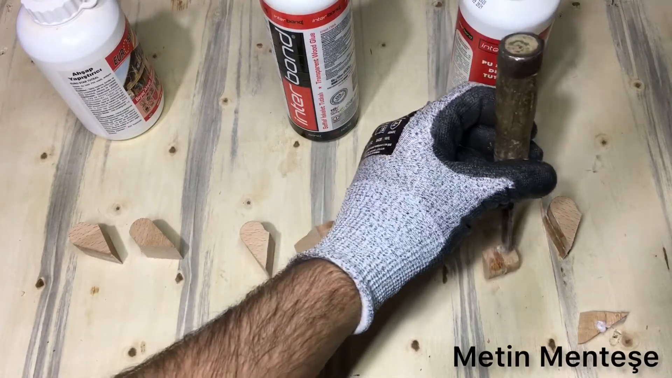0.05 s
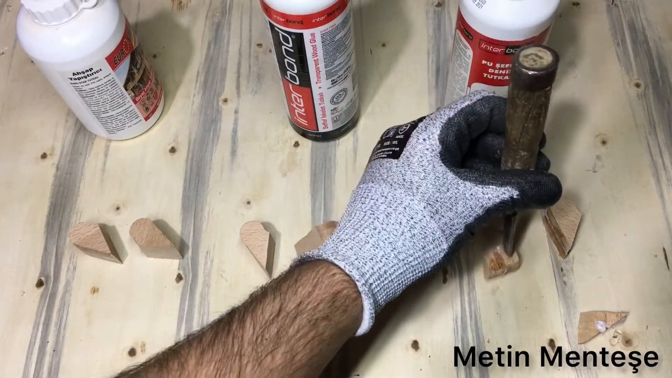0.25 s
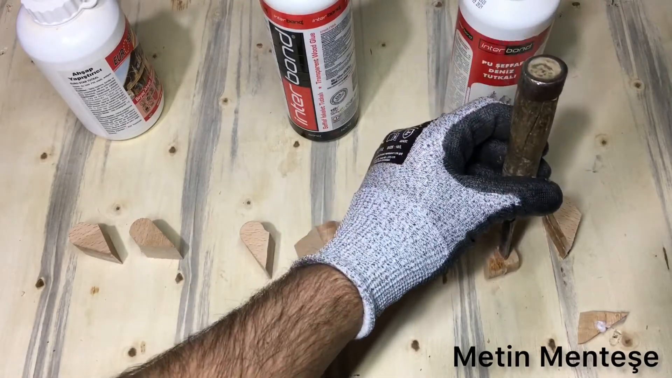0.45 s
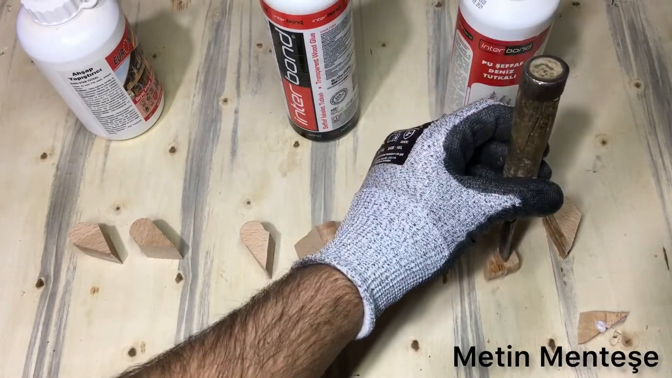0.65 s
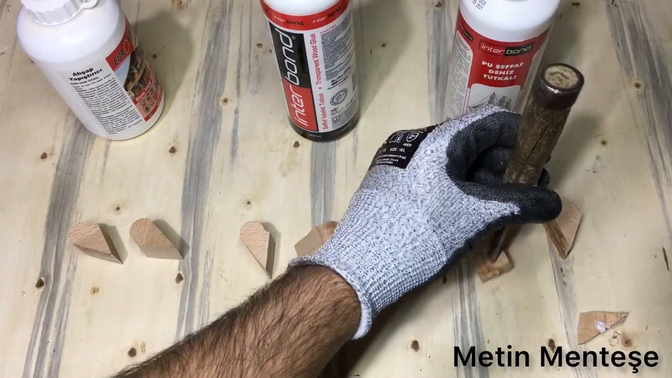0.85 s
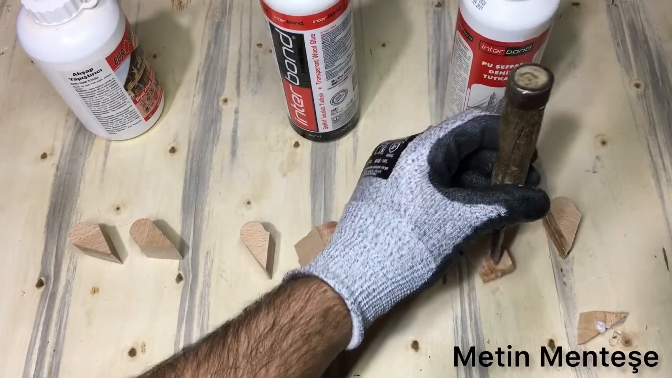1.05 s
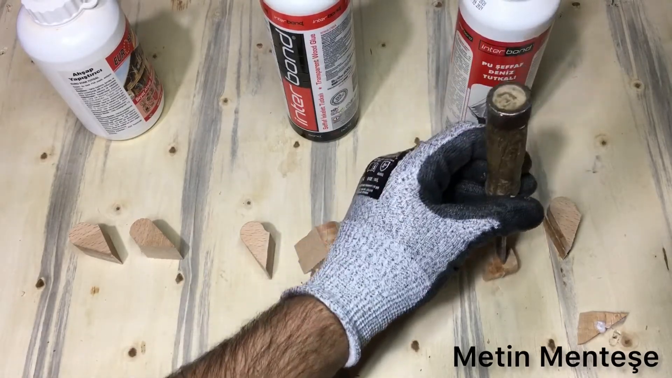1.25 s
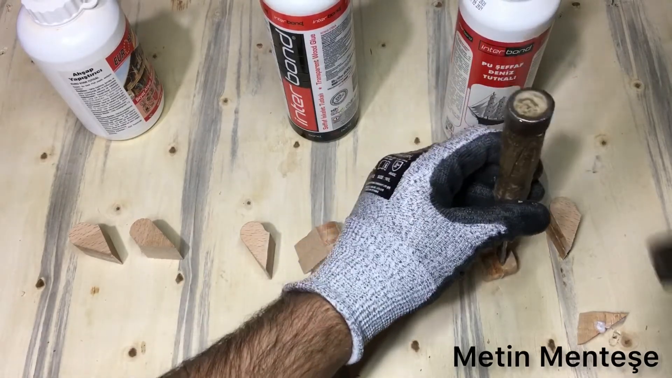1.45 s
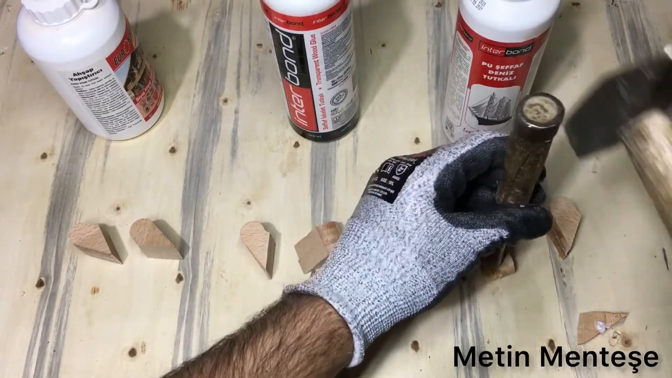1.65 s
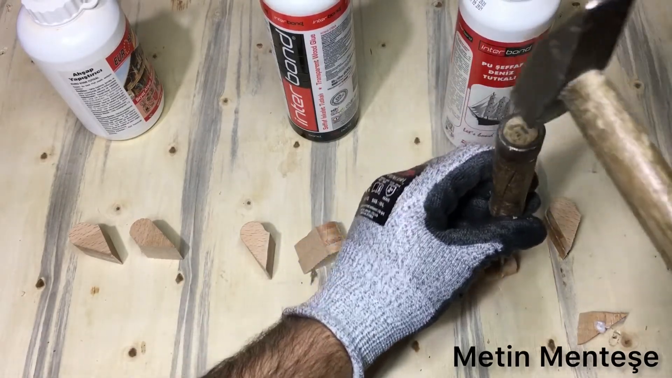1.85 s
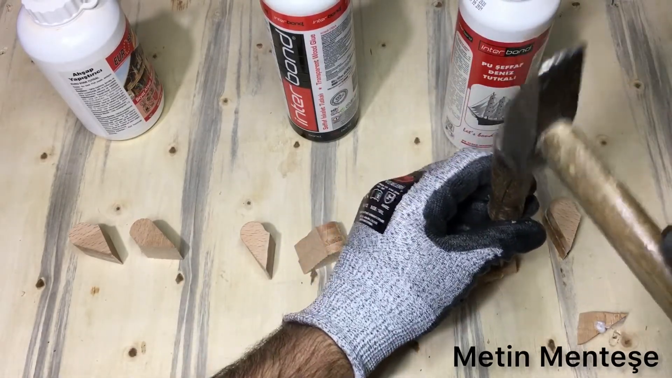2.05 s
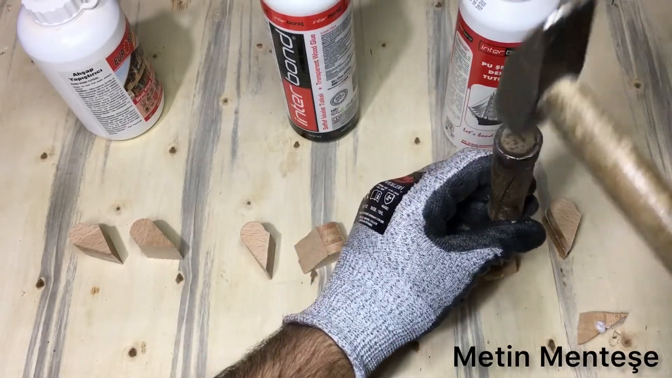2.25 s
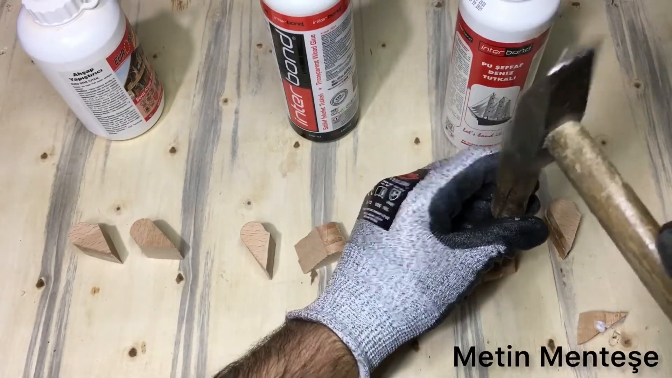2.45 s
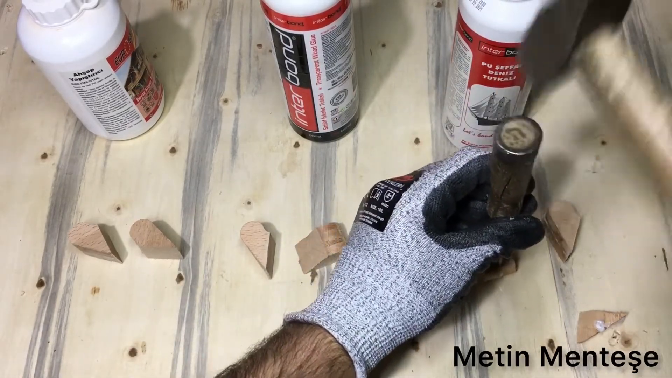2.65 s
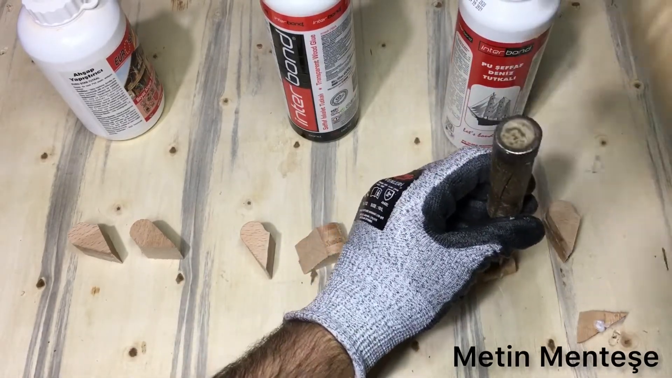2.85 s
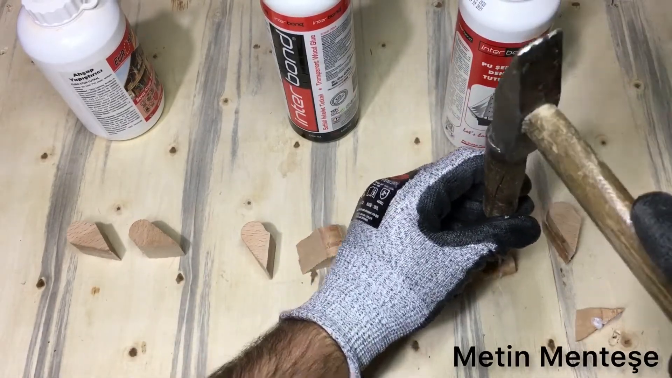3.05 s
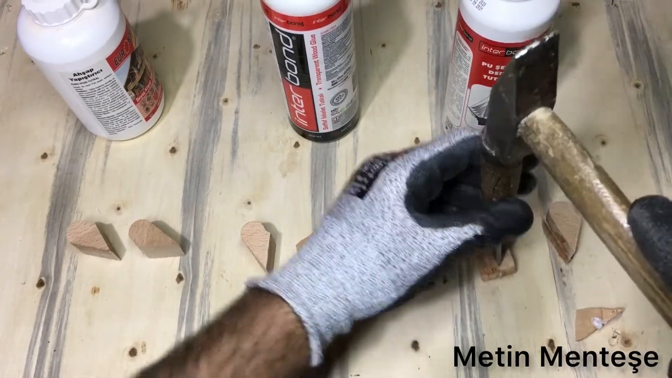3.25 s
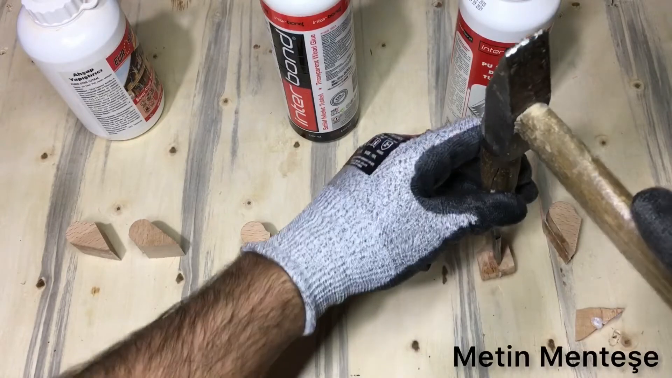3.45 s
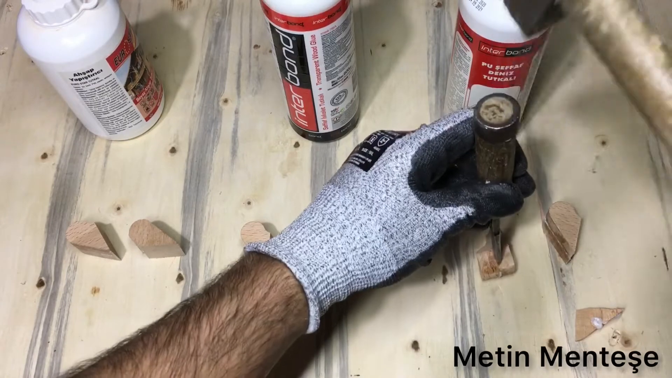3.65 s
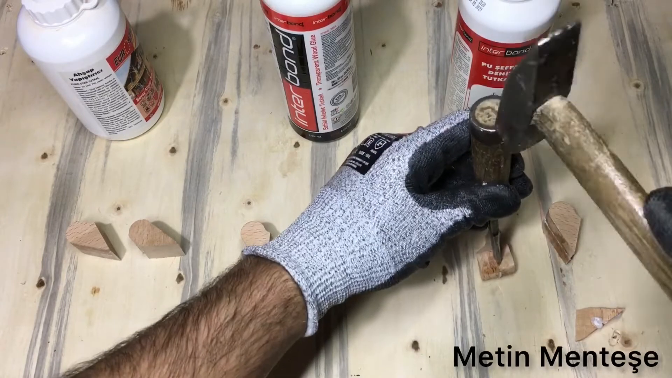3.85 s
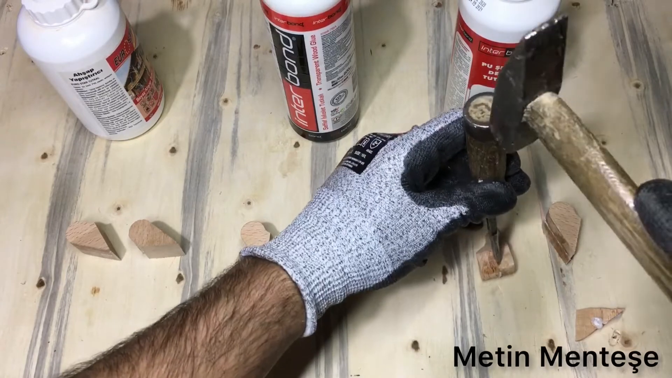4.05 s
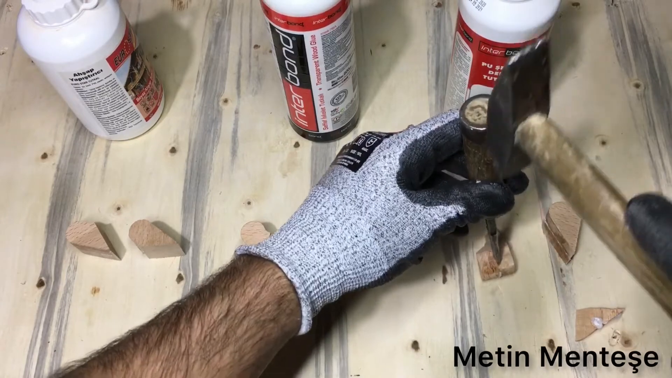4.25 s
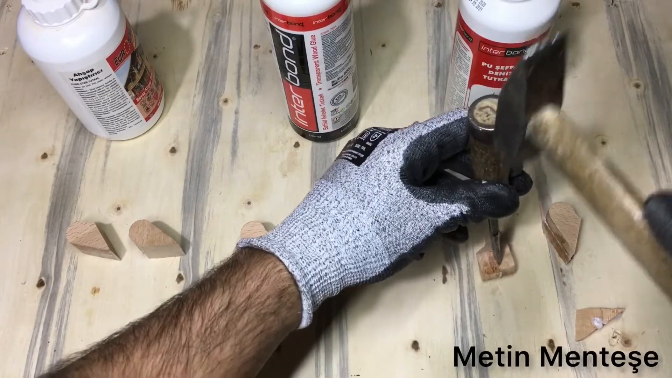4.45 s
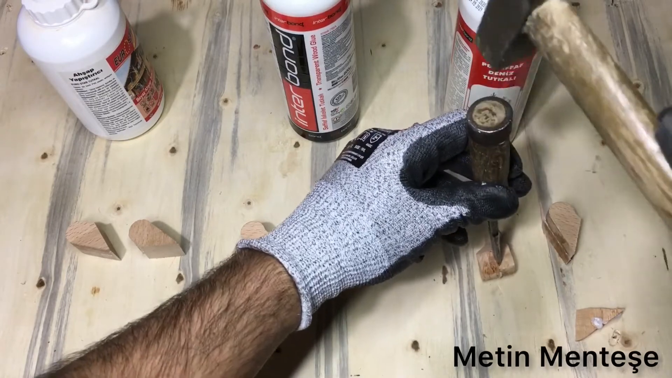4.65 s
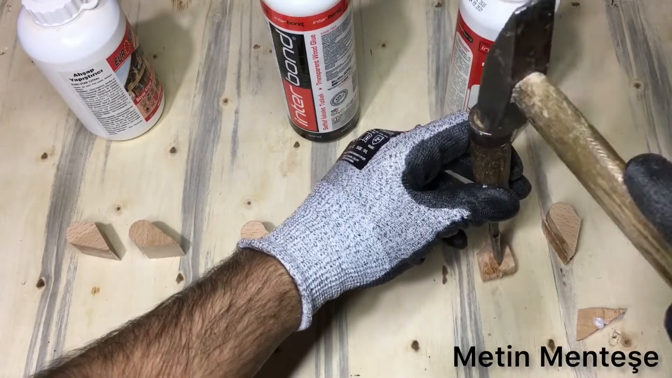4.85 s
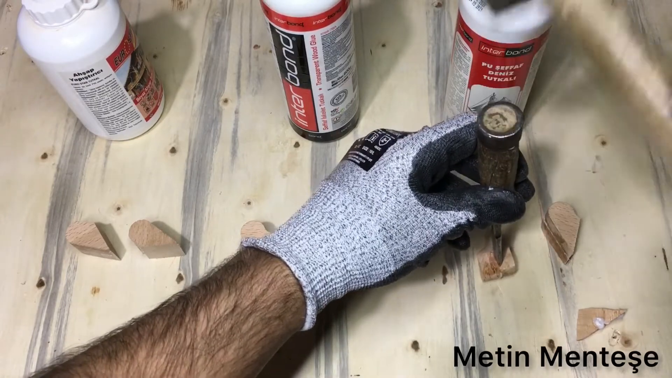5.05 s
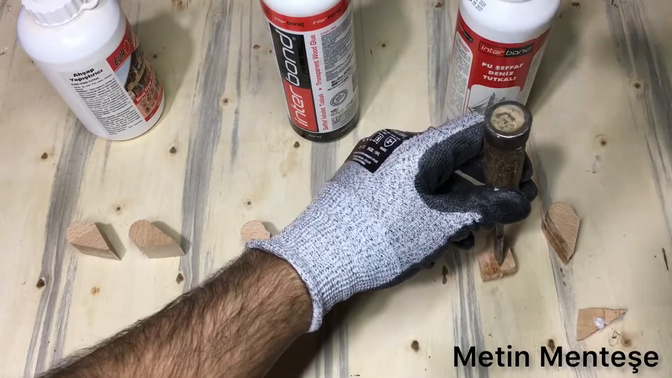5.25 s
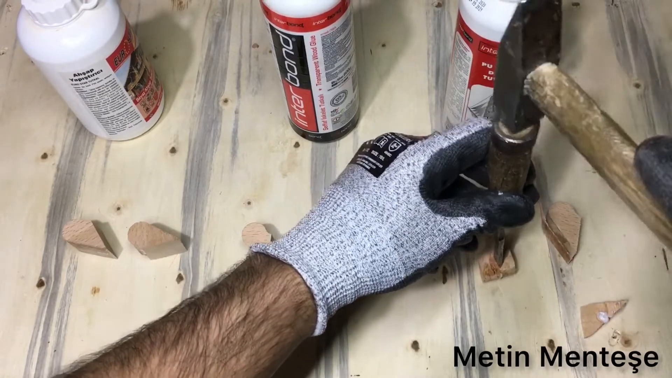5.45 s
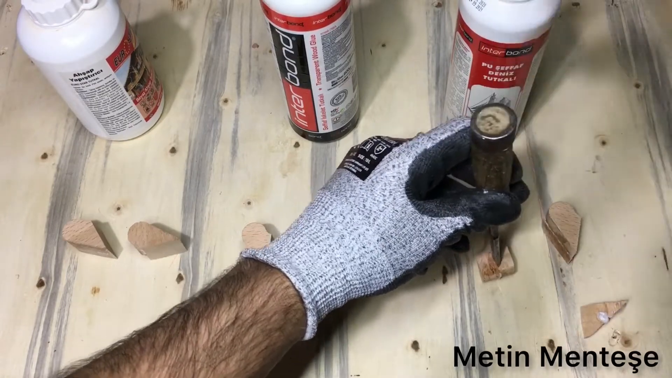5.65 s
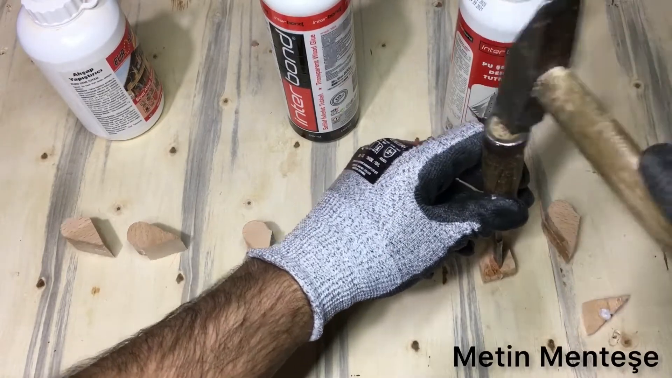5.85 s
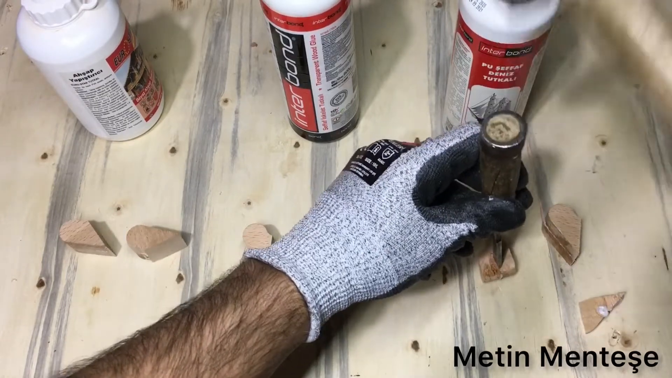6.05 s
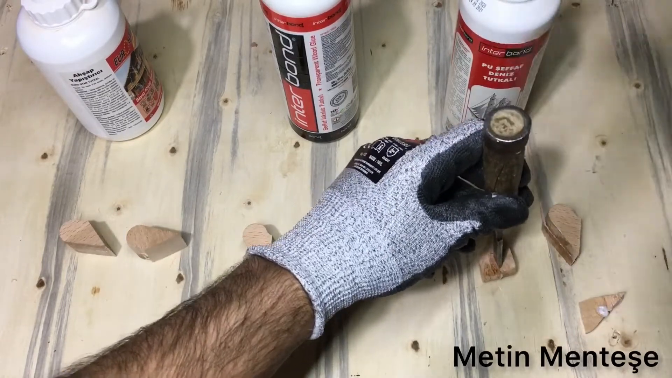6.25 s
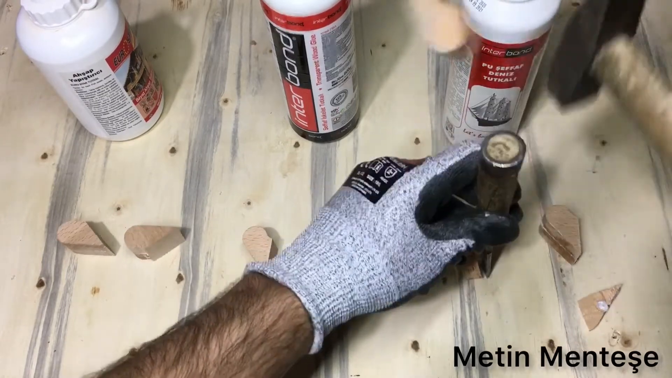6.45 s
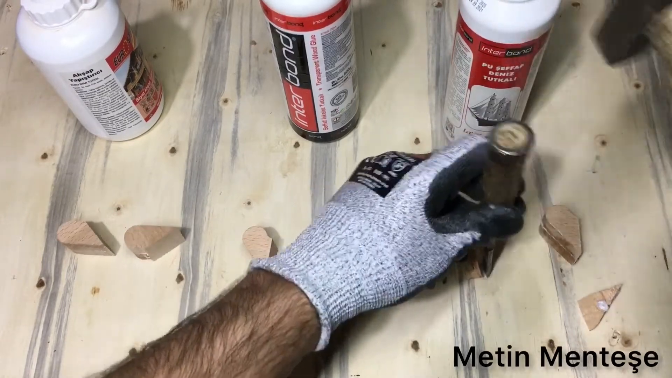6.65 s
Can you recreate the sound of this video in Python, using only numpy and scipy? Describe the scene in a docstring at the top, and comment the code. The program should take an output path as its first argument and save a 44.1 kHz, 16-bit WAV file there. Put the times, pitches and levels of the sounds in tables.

```python
"""Hammer and chisel on a workshop bench

A steel hammer strikes a capped chisel eight times to split glued blocks off a plywood bench in a small
workshop. Each blow clicks and pings in the steel (shaped noise, decaying sines), cracks the wood, thuds the
bench modes and rattles loose things. Around the blows soft broadband rustles come and go (noise under swelling
and fading envelopes), the chisel knocks faintly and the hammer face squeaks once on the cap, all over still
air."""
import sys
import numpy as np
from scipy import signal
from scipy.fft import rfft, irfft
from scipy.io import wavfile

SR = 44100
rng = np.random.default_rng(int(sys.argv[2]) if len(sys.argv) > 2 else 0)


def digitize_waveform(pressure):
    """Quantize a signal to 16-bit integers and store it at the path in sys.argv[1].

    Rows of a 2-D input are taken as channels; values are limited to [-1, 1].
    """
    field = np.atleast_2d(pressure).T
    bounded = np.clip(field, -1, 1)
    quanta = np.round(bounded * 32767).astype(np.int16)
    wavfile.write(sys.argv[1], SR, quanta)


N = 295911
RING_S = 1.2
AGE = np.arange(int(RING_S * SR)) / SR   # seconds since a contact


def from_db(db):
    """Decibels to gain."""
    return 10 ** (np.asarray(db) / 20)


def rms_one(x):
    """Scale to unit rms."""
    return x / np.sqrt(np.mean(x ** 2) + 1e-20)


def at_hz(points, hz):
    """Read a table on a log-frequency axis."""
    freqs, values = np.transpose(points)
    return np.interp(np.log(hz + 1e-3), np.log(freqs), values)


def fade(t60_s):
    """Exponential decay after a contact: 60 dB in t60_s."""
    return np.exp(-np.log(1000) * AGE / max(t60_s, 1e-3))


def swell(rise_s):
    """Vibration builds up exponentially towards one."""
    return 1 - np.exp(-AGE / max(rise_s, 1e-5))


def add(out, s, sound):
    """Mix a sound in at time s, cut at the end of out."""
    start = int(np.clip(round(s * SR), 0, len(out)))
    out[start:start + len(sound)] += sound[:len(out) - start]


def filtered(x, gain):
    """Weight the spectrum of x by a gain per frequency bin."""
    return irfft(rfft(x) * gain, len(x))


def noise(spectrum, size):
    """Unit-rms noise with a given spectrum."""
    hz = np.fft.rfftfreq(size, 1 / SR)
    return rms_one(filtered(rng.standard_normal(size), from_db(at_hz(spectrum, hz))))


def tilted(x, tilt_db_per_octave):
    """Brighten or dull a sound about 1 kHz, flat below 250 Hz, at unit rms."""
    hz = np.fft.rfftfreq(len(x), 1 / SR)
    octaves = np.log2(np.clip(hz, 250, None) / 1000)
    return rms_one(filtered(x, from_db(tilt_db_per_octave * octaves)))


def dying(x, t60s, rise_1khz_s):
    """Each octave dies at its own rate; low ones build up later, as slow bending waves do."""
    centres_hz = 60 * 2. ** np.arange(9)
    hz, bins = np.fft.rfftfreq(len(x), 1 / SR), rfft(x)
    out = np.zeros(len(x))
    for centre_hz, one in zip(centres_hz, np.eye(len(centres_hz))):
        band = irfft(bins * np.interp(hz, centres_hz, one), len(x))
        rise_s = rise_1khz_s * np.sqrt(1000 / centre_hz)
        out += band * fade(at_hz(t60s, centre_hz)) * swell(rise_s) ** 2
    return out


def ring(modes):
    """Struck modes as decaying sines; every blow shares its strength among them a little differently."""
    scatter_db = rng.normal(0, 1.2, len(modes))
    out = np.zeros(len(AGE))
    for (hz, db, t60_s), offset_db in zip(modes, scatter_db):
        out += from_db(db + offset_db) * np.sin(2 * np.pi * hz * AGE) * fade(t60_s)
    return out


def reflected(sound, wet_db=-3, t60_s=0.14):
    """Reflections off bench and walls make a clean ring flutter as it dies."""
    echoes = rng.standard_normal(len(AGE)) * fade(t60_s) * swell(.004)
    echoes *= from_db(wet_db) / np.sqrt(np.sum(echoes ** 2))
    return sound + signal.fftconvolve(sound, echoes)[:len(sound)]


# Spectrum of the still air. Each row: frequency in Hz, level in dB per Hz.
AIR_SPECTRUM = [(18, -36.5), (30, -1), (64, 10.5), (145, 0.5), (259, 0.5), (866, -9.5), (1590, -3),
                (4910, -19.5), (12300, -36), (16000, -31)]
AIR_DB = -63


def still_air():
    """Air of the workshop: steady shaped noise."""
    return from_db(AIR_DB) * noise(AIR_SPECTRUM, N)


# Rumble of the arm resting on the bench. Each row: time in seconds, level in dB.
ARM_LEVEL = [(0.0, -74), (.55, -63), (.85, -55), (1.3, -59.5), (1.7, -58), (2.0, -56.5), (2.8, -54.5),
             (4.1, -61), (4.4, -63.5), (4.55, -56.5), (5.2, -65), (6.7, -62.5)]
# Spectrum of that rumble. Each row: frequency in Hz, level in dB per Hz.
ARM_SPECTRUM = [(30, -42), (60, 1), (120, -6.5), (270, 2.5), (450, -7), (1100, -12), (3000, -31.5)]


def arm_rumble():
    """The arm shifts on the bench: low noise following a level curve."""
    level_db = np.interp(np.arange(N) / SR, *np.transpose(ARM_LEVEL))
    return from_db(level_db) * noise(ARM_SPECTRUM, N)


def rub(length_s, attack_s=0.037, release_t60_s=.33):
    """Envelope of one rustle: attack, hold, release."""
    attack = np.clip(AGE / attack_s, 0, 1)
    return attack * np.interp(AGE - length_s, AGE, fade(release_t60_s))


# Soft rustles, some leading into the blows. Each row: start in seconds, length in seconds, level in dB.
RUSTLES = [(0.0, .16, -56.5), (0.352, .06, -50), (0.493, .14, -56), (0.735, .43, -54),
           (1.279, 0.44, -54), (1.36, .1, -56.5), (1.779, .03, -54), (1.857, .05, -59),
           (2.274, .15, -51), (2.735, 0.22, -54), (3.146, 0.84, -59), (3.33, 0.29, -54),
           (3.402, .06, -50), (4.017, .12, -56), (4.313, 0.092, -59.5), (5.007, .12, -56),
           (6.222, 0.096, -49), (6.633, .1, -51.5)]
# Spectrum of the rustles. Each row: frequency in Hz, level in dB per Hz.
RUSTLE_SPECTRUM = [(240, -21.5), (400, -3.5), (742, -6), (1110, -1.5), (1400, -4.5), (2180, -6), (5030, -13),
                   (9320, -17.5), (13900, -23.5), (16000, -34)]
RUSTLE_FLOOR_DB = -65   # steady floor under the rustles


def random_curve(rate_hz):
    """Unit-variance random points at rate_hz, joined by straight lines."""
    return np.interp(np.arange(N) / SR * rate_hz, np.arange(N), rng.standard_normal(N))


def rustles(catch_db=1.5, catch_hz=90, waver_db=3.36, waver_hz=14):
    """Soft broadband rustles that flutter quickly and waver slowly."""
    power = np.full(N, from_db(RUSTLE_FLOOR_DB) ** 2)
    for s, length_s, db in RUSTLES:
        add(power, s, (from_db(db) * rub(length_s)) ** 2)
    flutter_db = catch_db * random_curve(catch_hz) + waver_db * random_curve(waver_hz)
    return np.sqrt(power) * from_db(flutter_db) * noise(RUSTLE_SPECTRUM, N)


# Faint contacts. Each row: start in seconds, level in dB, tilt in dB per octave, t60 in seconds.
KNOCK_EVENTS = [(0.161, -50, 1.5, 0.21), (0.375, -51, 1, 0.26), (0.627, -42, 0.5, 0.048),
                (0.755, -40.5, -1.5, 0.39), (0.786, -48, 7, 0.2), (1.186, -44, -18, 0.11),
                (1.658, -44.5, -23, 0.4), (1.886, -51, 0.5, 0.47), (2.393, -40, 0.5, 0.58),
                (3.566, -37.5, 8, 0.17), (3.791, -45.5, 2.5, 0.22), (4.068, -44.5, -14, 0.28),
                (4.132, -44, -0.5, 0.1), (4.288, -43, 2, 0.19), (6.693, -39, 1.5, 0.41)]
# Spectrum of a contact before tilt. Each row: frequency in Hz, level in dB per Hz.
KNOCK_SPECTRUM = [(40, 0), (150, 3), (330, 11), (600, -2), (1300, 1), (3000, -8), (7000, -18.5),
                  (15000, -30.5)]


def knocks(rise_s=.003):
    """Soft contacts of glove and chisel with the wood: tilted noise, quick rise, decay."""
    out, onset = np.zeros(N), swell(rise_s)
    for s, db, tilt_db_per_octave, t60_s in KNOCK_EVENTS:
        contact = tilted(noise(KNOCK_SPECTRUM, len(AGE)), tilt_db_per_octave)
        add(out, s, from_db(db) * contact * onset * fade(t60_s))
    return out


# The hammer face squeaks on the cap. One row: start in seconds, length in seconds.
SQUEAK_TIME = (4.174, .044)
# Resonances of the squeak. Each row: frequency in Hz, level in dB.
SQUEAK_RESONANCES = [(1180, -57), (2640, -55), (3700, -65), (13980, -63)]


def squeak(half_width_hz=90):
    """A brief slip of hammer face on cap sings in a few narrow resonances."""
    s, length_s = SQUEAK_TIME
    out, window = np.zeros(N), signal.windows.tukey(int(length_s * SR))
    for hz, db in SQUEAK_RESONANCES:
        edges_hz = [hz - half_width_hz, hz + half_width_hz]
        band = signal.butter(2, edges_hz, "band", fs=SR, output="sos")
        tone = signal.sosfilt(band, rng.standard_normal(len(AGE)))[-len(window):]   # settled part
        add(out, s, from_db(db) * rms_one(tone) * window)
    return out


# Spectrum of the room. Each row: frequency in Hz, level in dB per Hz.
ROOM_SPECTRUM = [(30, -25), (55, -3), (130, -2), (300, -2.5), (600, -0.5), (1200, -0.5), (2200, -8),
                 (3000, -15), (7000, -16), (15000, -31.5)]
# Decay of the room. Each row: frequency in Hz, t60 in seconds.
ROOM_DECAY = [(60, 1), (300, 0.76), (1200, 0.44), (3000, 0.48), (7000, 0.14), (14000, .25)]


def room_tail(rise_1khz_s=.01):
    """The room answers a blow: noise dying octave by octave."""
    return dying(noise(ROOM_SPECTRUM, len(AGE)), ROOM_DECAY, rise_1khz_s)


# Spectrum of loose things landing. Each row: frequency in Hz, level in dB per Hz.
RATTLE_SPECTRUM = [(60, -23.5), (220, 2.5), (350, 11), (600, -8.5), (2200, -2.5), (4500, -12.5),
                   (9000, -18), (16000, -29.5)]


def rattle(first_s=.008, fall_db_per_s=190, tick_t60_s=0.074, slot_s=.0035):
    """Loose blocks and bottles hop and land; the late landings are the weak ones."""
    out, ticks = np.zeros(len(AGE)), noise(RATTLE_SPECTRUM, len(AGE))
    waits_s = slot_s * (np.arange(45) + rng.random(45))
    sizes_db = rng.uniform(-8, 2, len(waits_s))
    for wait_s, size_db in zip(waits_s, sizes_db):
        tick = np.roll(ticks, rng.integers(len(AGE))) * fade(tick_t60_s)
        settling = np.cos(np.pi / 2 * wait_s / waits_s[-1])
        add(out, first_s + wait_s, tick * settling * from_db(size_db - fall_db_per_s * wait_s))
    return out


# Modes of the bench top. Each row: frequency in Hz, level in dB, t60 in seconds.
BENCH_MODES = [(54, -29, .7), (75, -25, .6), (104, -10, .06), (118.5, -15, .31), (143, -17, .22),
               (172, -28, .45), (205, -19, .28), (258, -19, .2), (296, -23, .33), (354, -18, .2),
               (382, -27, .36), (560, -23, .22), (690, -30, .35), (944, -25, .26), (1093, -24, .24),
               (1258, -27, .22), (1483, -24, .2), (1670, -26, .22), (1712, -27, .22), (1925, -30, .2),
               (2220, -28, .14), (3225, -29, .15)]


def bench_thud():
    """The bench top is driven downwards and its modes ring."""
    return -ring(BENCH_MODES) * swell(0.00028)


# Spectrum of cracking wood. Each row: frequency in Hz, level in dB per Hz.
WOOD_SPECTRUM = [(40, -23.5), (120, -3.5), (220, 2), (350, -3.5), (650, -2.5), (1050, 0), (1700, -3),
                 (2300, -9.5), (3200, -8.5), (4500, -13.5), (7000, -14.5), (10000, -25.5), (14500, -12),
                 (16000, -45)]
# Decay of the wood. Each row: frequency in Hz, t60 in seconds.
WOOD_DECAY = [(100, 0.25), (400, 0.21), (1500, 0.21), (4000, 0.2), (14000, .16)]


def wood_grain():
    """Noise for the dense modes of block and board."""
    return noise(WOOD_SPECTRUM, len(AGE))


def wood_crack(grain, tilt_db_per_octave, own=0.18, rise_1khz_s=0.00037, bite_lag_s=.0105):
    """The dense modes, much alike at each blow, with a second push as the edge bites."""
    modes = tilted(grain + own * wood_grain(), tilt_db_per_octave)
    second_push = np.interp(AGE - bite_lag_s, AGE, fade(0.029), left=0)
    return dying(modes, WOOD_DECAY, rise_1khz_s) * (1.075 + second_push)


# Modes of the chisel. Each row: frequency in Hz, level in dB, t60 in seconds.
CHISEL_MODES = [(5295, -6, .13), (5400, -17, .28), (6635, -19, .42), (6810, -17, .18), (7945, -4, .13),
                (8170, -7, .12), (9957, 0, .11), (12487, -5, .13)]


def chisel_ring(favoured_hz, fall_db_per_octave=16):
    """The way the edge sits in the wood lets some of the chisel's modes ring and damps the others."""
    modes = []
    for hz, db, t60_s in CHISEL_MODES:
        distance_octaves = abs(np.log2(hz / favoured_hz))
        modes.append((hz, db - fall_db_per_octave * distance_octaves, t60_s))
    return reflected(ring(modes))


# Modes of the hammer head. Each row: frequency in Hz, level in dB, t60 in seconds.
HAMMER_MODES = [(9040, -14, .18), (11060, -5, .06), (11130, -8, .17), (13150, -11, .1), (13915, -2, .09),
                (14190, -6, .09), (14420, -7, .09), (14860, -11, .07)]


def hammer_ping(favoured_hz, boost_db=11, width_hz=200, boost_t60_s=.05):
    """The spot where the face lands drives the head's modes near one frequency hardest."""
    driven = []
    for hz, db, _ in HAMMER_MODES:
        drop_db = 10 * ((hz - favoured_hz) / width_hz) ** 2
        driven.append((hz, db + boost_db - drop_db, boost_t60_s))
    return reflected(ring(HAMMER_MODES + driven))


# Spectrum of the steel click. Each row: frequency in Hz, level in dB per Hz.
CLICK_SPECTRUM = [(400, -25), (1500, 6.5), (3000, 3.5), (5000, -2.5), (7600, -9), (9100, -2), (10200, -9),
                  (11050, -0.5), (11900, -11), (13000, -6), (14100, -8.5), (14900, -7.5), (16000, -34)]


def steel_click(tilt_db_per_octave, favoured_hz, bump_db=7, bump_width_hz=550, echo_db=-23, echo_t60_s=0.15):
    """Steel meets steel: a short burst, boosted round the favoured ping, and its echo off near surfaces."""
    hz = np.fft.rfftfreq(len(AGE), 1 / SR)
    bump = from_db(bump_db * np.exp(-((hz - favoured_hz) / bump_width_hz) ** 2))
    splash = tilted(filtered(noise(CLICK_SPECTRUM, len(AGE)), bump), tilt_db_per_octave)
    burst = swell(.0007) * fade(.011)
    echo = from_db(echo_db) * swell(.001) * fade(echo_t60_s)
    return splash * (burst + echo)


# Hammer blows. Each row: start in seconds, steel click in dB, steel tilt in dB per octave, wood crack in dB,
# crack tilt in dB per octave, bench thud in dB, hammer ping in dB, favoured ping in Hz, chisel ring in dB,
# favoured chisel frequency in Hz, rattle in dB, room in dB.
HAMMER_BLOWS = [(2.055, -10.5, 3, -23.5, -3, -15, -29, 13915, -57, 9960, -57, -40.5),
                (2.4465, -2, 4.5, -13, -2, -3, -28, 11130, -18, 9000, -26.5, -29),
                (2.9102, -4, 5, -9, -2.5, 1, -40, 14860, -25, 7000, -19, -21.5),
                (3.8299, -0.5, 5, -20.5, -2, -11, -29.5, 9260, -38, 8000, -36.5, -35.5),
                (4.8015, 0.5, 9.5, -16.5, -1, -7.5, -27, 14190, -33, 5320, -43, -30.5),
                (5.3314, 1.5, -0.5, -10, -5, 1.5, -26, 11060, -35, 5400, -16.5, -20.5),
                (5.829, 0.5, -0.5, -12, -3.5, 1.5, -51, 11060, -43.5, 8040, -14.5, -19),
                (6.3013, 3.5, -2, -8.5, -2, -4, -36, 11060, -24, 6800, -18, -19.5)]


def blows(bench_lag_s=.0042, chisel_lag_s=.013):
    """The click comes first, the bench gives way a moment later, the chisel rings as it rebounds."""
    out, grain = np.zeros(N), wood_grain()
    for (s, click_db, steel_tilt, wood_db, wood_tilt, thud_db, ping_db, ping_hz,
         chisel_db, chisel_hz, rattle_db, room_db) in HAMMER_BLOWS:
        add(out, s, from_db(click_db) * steel_click(steel_tilt, ping_hz))
        add(out, s, from_db(ping_db) * hammer_ping(ping_hz))
        add(out, s, from_db(wood_db) * wood_crack(grain, wood_tilt))
        add(out, s + bench_lag_s, from_db(thud_db) * bench_thud())
        add(out, s + chisel_lag_s, from_db(chisel_db) * chisel_ring(chisel_hz))
        add(out, s, from_db(rattle_db) * rattle())
        add(out, s, from_db(room_db) * room_tail())
    return out


def scene():
    """All sources over the still air of the workshop, at one microphone."""
    hand = arm_rumble() + rustles() + knocks()
    return (still_air() + hand + squeak() + blows())[None]


def record(dry, low_cut_hz=43, ceiling=1.15, top_cut_hz=16300):
    """The deepest bass is shed, the loudest peaks are rounded and the top is cut."""
    low_cut = signal.butter(4, low_cut_hz, "high", fs=SR, output="sos")
    top_cut = signal.ellip(10, .2, 90, top_cut_hz, fs=SR, output="sos")
    rounded = ceiling * np.tanh(signal.sosfilt(low_cut, dry) / ceiling)
    return signal.sosfilt(top_cut, rounded)


dry = scene()
out = record(dry)
digitize_waveform(out)
```